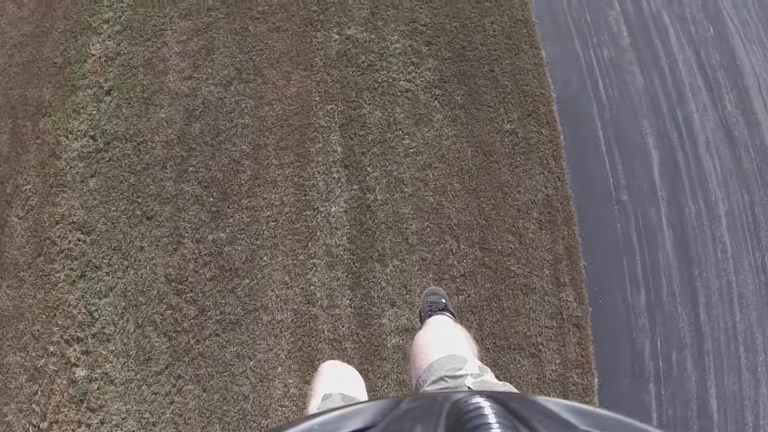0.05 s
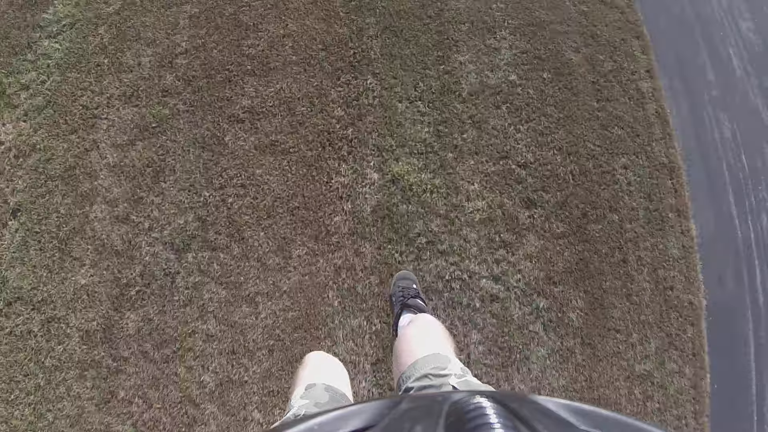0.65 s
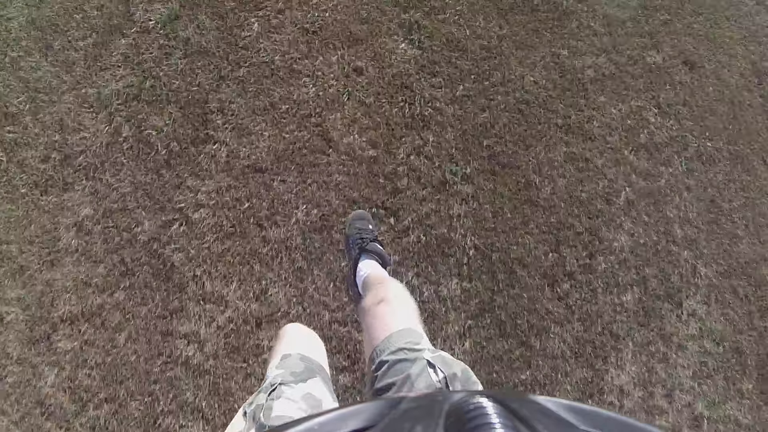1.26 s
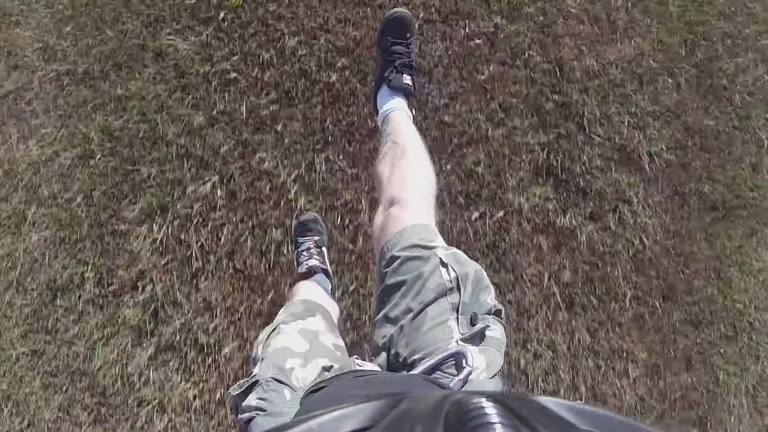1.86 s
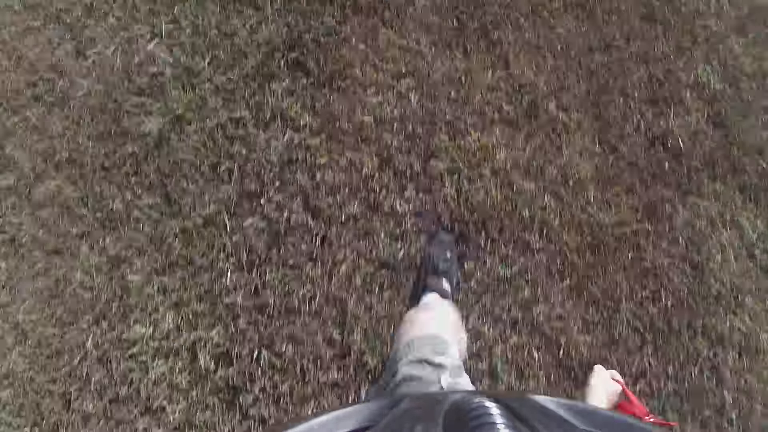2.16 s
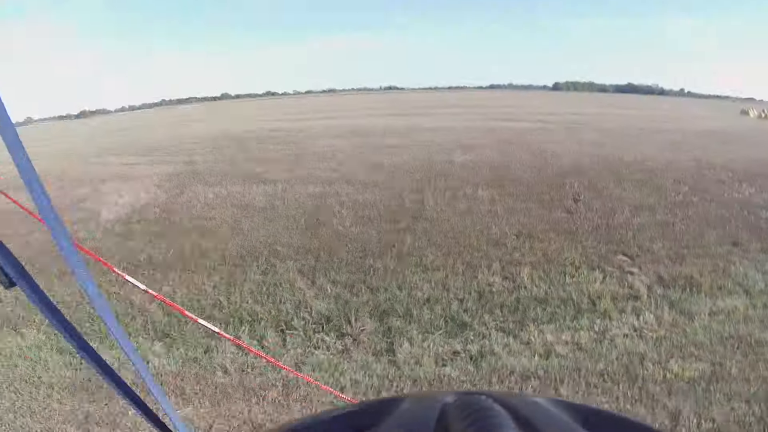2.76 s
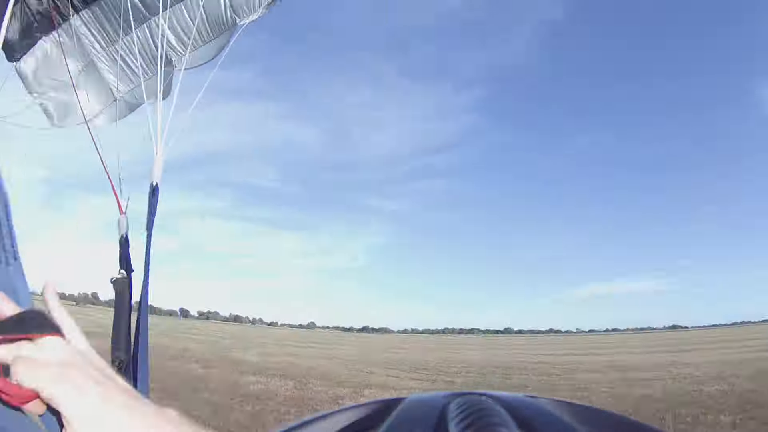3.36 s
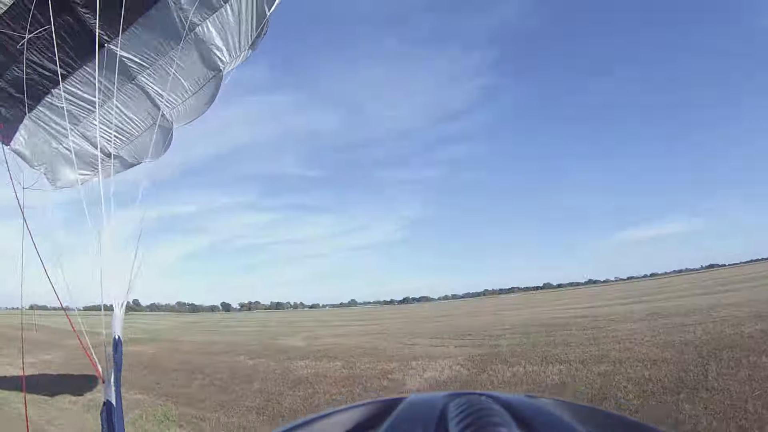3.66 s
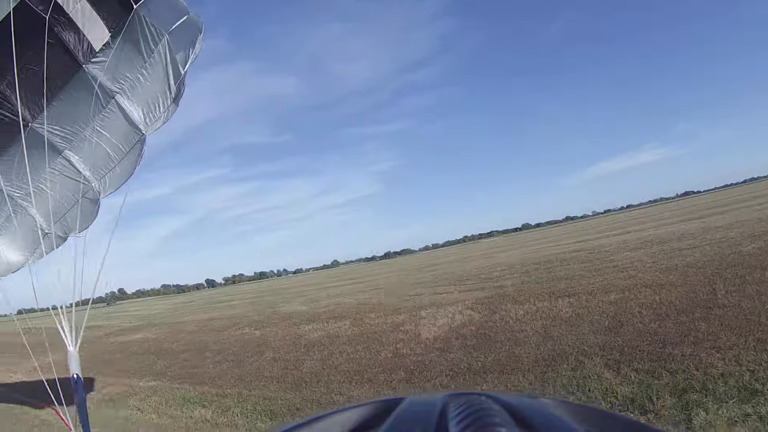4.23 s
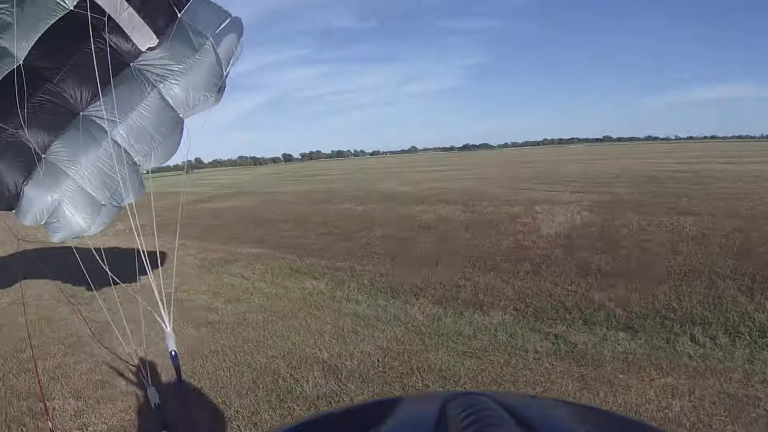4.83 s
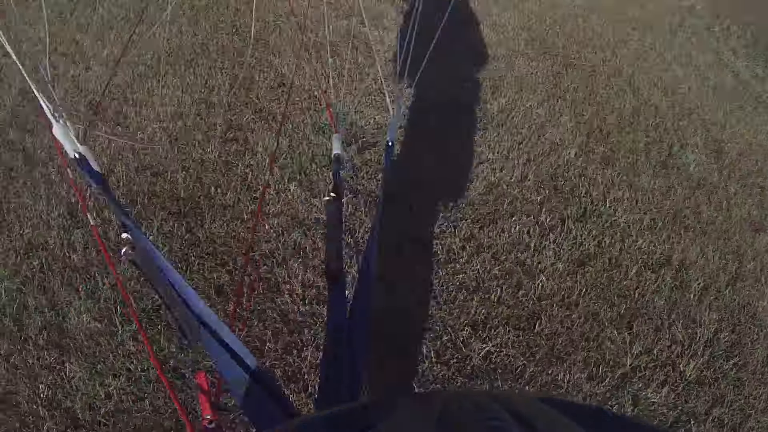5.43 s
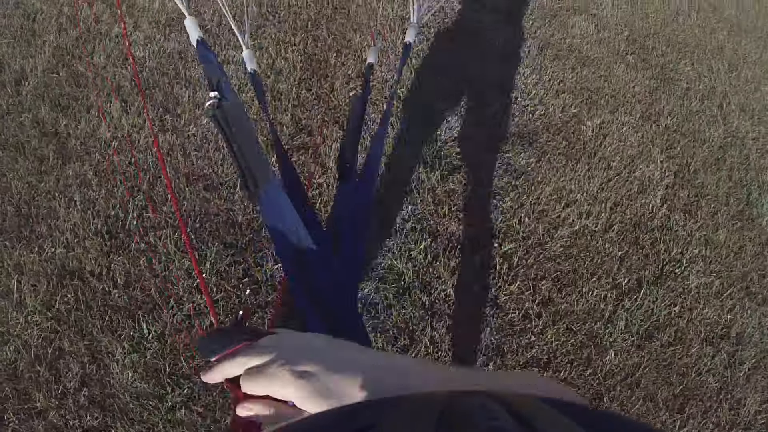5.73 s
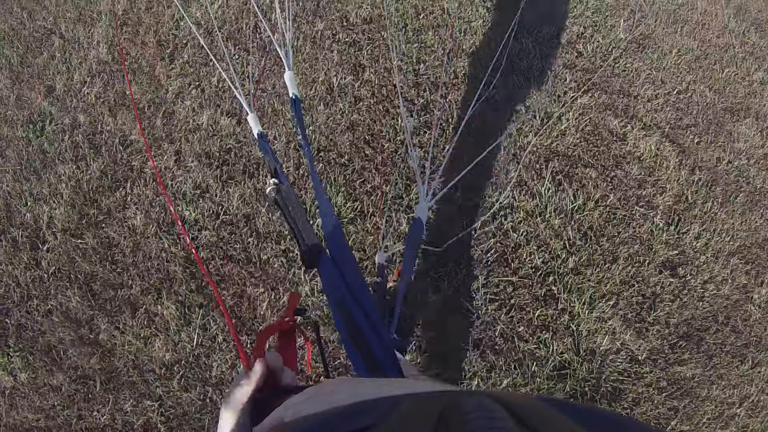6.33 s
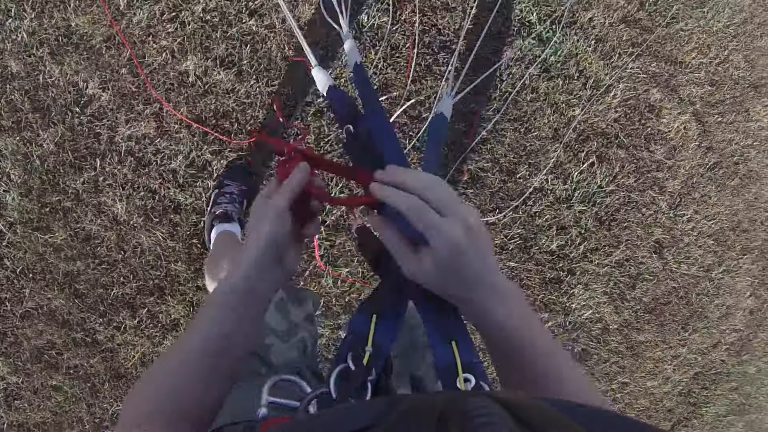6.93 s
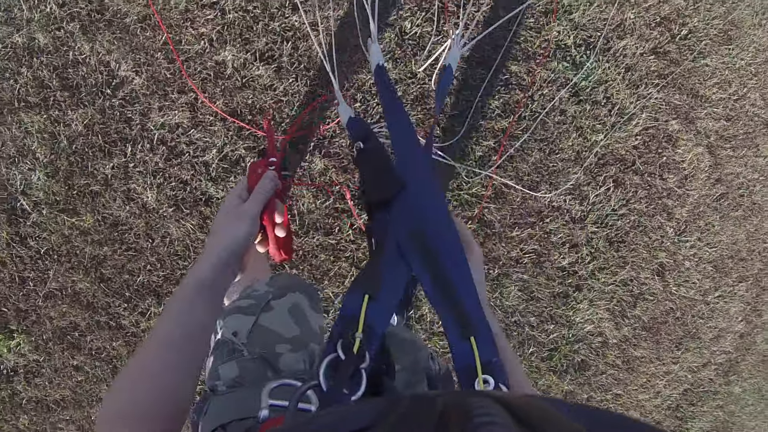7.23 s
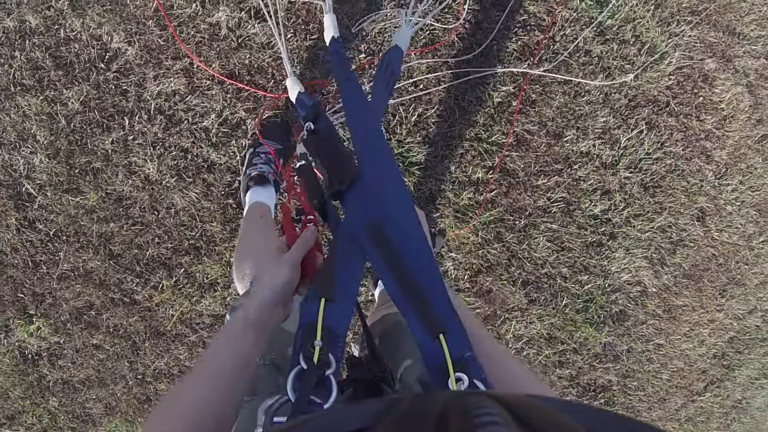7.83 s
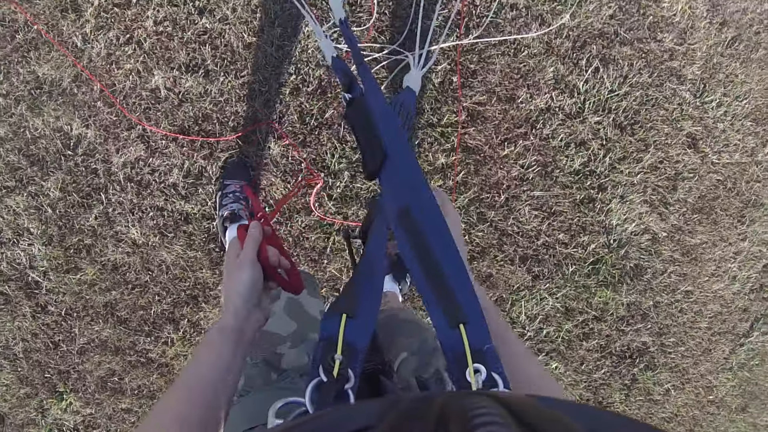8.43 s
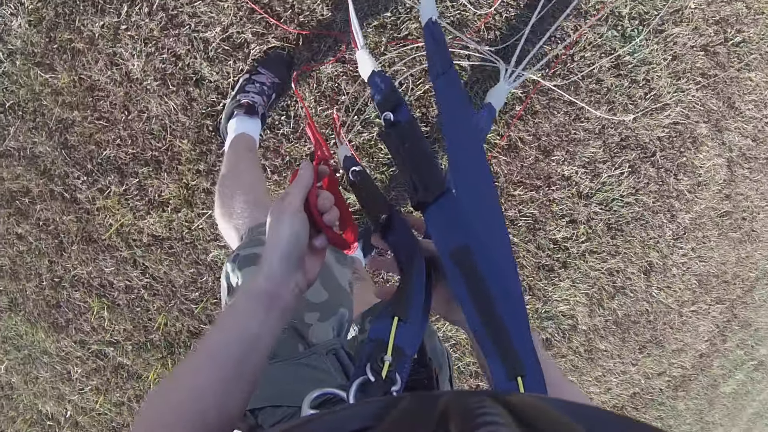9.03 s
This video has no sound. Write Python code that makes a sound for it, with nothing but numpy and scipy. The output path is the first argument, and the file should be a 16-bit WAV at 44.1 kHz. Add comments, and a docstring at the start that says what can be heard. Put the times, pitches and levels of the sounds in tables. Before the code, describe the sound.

A strong, hissing rush of air with a low buffeting rumble blows over a cased helmet microphone, dulling and fading from about 1.4 seconds. At 2.1 seconds the parachutist touches down with a deep thump and a sharp plastic double clack, followed by low footfall jolts, cloth rustle and faint grass swishes. Around 2.9 seconds comes a quick cluster of hard knocks and thuds, with a strap rasping jerkily across the helmet. From 3.5 to 5.5 seconds there are softer, scattered bumps and clicks while sleeves and harness rub close by. The nylon canopy crumples very faintly a few metres off from about 5.3 seconds. Another loud clack and thump hits at 6 seconds, with smaller knocks near 6.5 and 7. The rustling then dies down to the faint hiss of an open field and a tiny tick or two. Thin, very high insect sounds are barely audible underneath.

```python
"""Air rushes over a cased camera on a parachutist's helmet, swooping low over a grass field.
The rush dies as the canopy flares; the touchdown and the steps after it jolt the mount and make
the case knock, right at the microphone. A strap scrapes across the helmet, harness and sleeves
rustle close by, and the canopy crumples onto the grass a few metres off.
Behind it all lie the faint hiss of the open field and two thin insect calls."""
import sys
import numpy as np
from scipy import signal
from scipy.fft import rfft, irfft, next_fast_len
from scipy.io import wavfile
from scipy.ndimage import uniform_filter1d, minimum_filter1d

SR = 44100
rng = np.random.default_rng(int(sys.argv[2]) if len(sys.argv) > 2 else 0)


def int16_out(signal):
    """Quantize to a 16-bit WAV file."""
    q = np.round(np.clip(np.atleast_2d(signal).T, -1, 1) * 32767)
    wavfile.write(sys.argv[1], SR, q.astype(np.int16))


N = 404838
TIME = np.arange(N) / SR
TOUCHDOWN_S, UPRIGHT_S, HANDS_REST_S = 2.05, 3.52, 7.17   # feet touch; run-out ends; hands stop working
MOUNT_HZ, MOUNT_WIDTH_HZ = 105.6, 14.8   # resonance of the springy camera mount

# Air over the case, following the airspeed. Each row: time in seconds, level in dB.
AIRFLOW = [(0.0, -38), (0.35, -39.5), (0.75, -38), (1.2, -39.5), (1.48, -42.5), (1.7, -46), (1.8, -51.5),
           (2.0, -56.5)]
# The rush at the microphone. Each row: frequency in Hz, relative density in dB.
RUSH_SPECTRUM = [(200, 4.5), (400, -1.5), (600, -5.5), (1150, -7), (1500, -3), (2700, -5.5), (3500, -2.5),
                 (4100, -13.5), (5200, -19.5), (6300, -23.5), (8700, -27.5), (10000, -33), (15000, -45)]
# The buffeting that shakes the case. Each row: frequency in Hz, relative density in dB.
BUFFET_SPECTRUM = [(20, -4.5), (40, 0.5), (70, 0.5), (105, 6.5), (150, -2), (200, -10), (300, -16.5),
                   (500, -25), (1000, -44)]
# Cavities that the air blows across. Each row: frequency in Hz, width in Hz, gain in dB.
CAVITIES = [(893, 70, -2.5), (1740, 260, -9.5), (2254, 310, -3.5), (3080, 330, -1), (4660, 170, -1),
            (5550, 170, 6.5)]

def wind(buffet_db=-39.5, flutter_db=0.47, lumps_db=2.1, dull_hz=3700):
    """Turbulence hisses through the case's cavities and shakes it, dying away after touchdown."""
    airflow = from_db(np.interp(TIME, *np.transpose(AIRFLOW)))
    flying = held(-1.2, TOUCHDOWN_S, 1, .15)
    rush = airflow * flying
    buffet = from_db(buffet_db) * np.sqrt(airflow / airflow.max()) * flying
    eddies = np.array([coloured(rng.standard_normal(N), RUSH_SPECTRUM) for _ in range(2)])
    whistles = sum(from_db(db) * resonance(eddies, hz, width) for hz, width, db in CAVITIES)
    fast, slow = rms_one(eddies + whistles)
    slow = signal.sosfilt(signal.butter(4, dull_hz, fs=SR, output="sos"), slow)
    # as the air slows, the small eddies that make the treble are the first to go
    slowness = np.clip(1.14 * (1 - rush / rush.max()) ** 1.6, 0, 1)
    air = np.sqrt(1 - slowness) * fast + np.sqrt(slowness) * slow
    shake = rms_one(on_mount(coloured(rng.standard_normal(N), BUFFET_SPECTRUM), ring_db=-13))
    return rush * air * from_db(flutter_db * drift(35)) + buffet * shake * from_db(lumps_db * drift(20))


# Footfalls and tugs, reaching the microphone through the helmet.
# Each row: centre in seconds, strength in dB, swing frequency in Hz.
JOLTS = [(2.066, -7.5, 28), (2.07, -4, 69), (2.144, -18, 14), (2.248, -17.5, 31.5), (2.306, -21, 30),
         (2.76, -29, 25), (2.822, -26.5, 27), (2.896, -15.5, 92), (2.915, -23, 67), (2.951, -19, 67),
         (2.977, -16, 91), (3.069, -22, 100), (3.52, -33.5, 23), (3.906, -30.5, 30), (4.010, -37, 7.4),
         (4.412, -28, 19.5), (4.55, -41, 95), (4.564, -34.5, 12.6), (4.63, -43, 14), (4.945, -26, 34),
         (5.1, -41.5, 71), (5.466, -20, 32.4), (5.520, -24, 17), (5.966, -5, 41.4), (6.444, -17.5, 45),
         (6.481, -25, 37), (6.929, -32, 30), (8.885, -54, 100), (9.12, -61, 110)]

def jolts(push_db=0.5, shortness=3.37, heel_db=-29):
    """Each jolt is one push and rebound of the helmet, which leaves the mount ringing."""
    pushes, heels = np.zeros(N), np.zeros(N)
    for centre, db, hz in JOLTS:
        near = abs(TIME - centre) < 2 / hz
        turns = (TIME[near] - centre) * hz
        pushes[near] -= from_db(db + push_db) * np.sin(2 * np.pi * turns) * np.exp(-shortness * turns ** 2)
        heels[round(centre * SR)] = from_db(heel_db + db / 2)
    return on_mount(pushes, ring_db=1.5) - signal.fftconvolve(heels, bob(rise_s=0.0037))[:N]


# The rumble of the body under the helmet. Each row: frequency in Hz, relative density in dB.
SWAY_SPECTRUM = [(12, 2.5), (22, 2.5), (40, -8.5), (70, -14), (110, -16.5), (160, -29.5), (300, -43.5),
                 (600, -43.5)]

def sway(sway_db=-30, standing_db=-56, lean_db_per_s=114.5, settle_db_per_s=42.5):
    """The body leans into each jolt and settles after it, rumbling through the helmet."""
    t = np.arange(0, N / SR, .005)
    swings_db = [sway_db + 0.37 * db - np.maximum(lean_db_per_s * (s - t), settle_db_per_s * (t - s))
                 for s, db, _ in JOLTS]
    level = np.hypot(from_db(np.max(swings_db, axis=0)), from_db(standing_db))
    rumble = rms_one(on_mount(coloured(rng.standard_normal(N), SWAY_SPECTRUM), ring_db=1.5))
    return np.interp(TIME, t, level) * rumble


# Modes of the case around the microphone. Each row: frequency in Hz, width in Hz, gain in dB.
CASE_MODES = [(480, 350, -28.5), (970, 270, -7), (1290, 197, 1), (1430, 102, 1.5), (1618, 112, 4),
              (2126, 130, 5.5), (2456, 234, 2.5), (2920, 220, -2.5), (3394, 180, -6.5), (4300, 180, -14.5),
              (4500, 180, -15.5), (5410, 410, -11.5), (5730, 260, -13), (8350, 1200, -41.5)]
# The case knocks in its mount. Each row: start in seconds, ring level in dB, tilt in dB per octave.
KNOCKS = [(2.048, -27, -6), (2.0697, -15, -1.5), (2.0793, -8, 0), (2.154, -35, -3), (2.3455, -31.5, -3),
          (2.6728, -36.5, -8), (2.7626, -37, 2), (2.8482, -39.5, -12), (2.8897, -10, 1.5), (2.923, -30, -6),
          (2.9542, -15, 0), (3.0408, -26, 2), (3.056, -21.5, 4), (3.0934, -33.5, 0), (3.8924, -29.5, -3.5),
          (4.0454, -35.5, -2.5), (4.31, -34, -2.5), (5.061, -33, -1.5), (5.1788, -40.5, -6),
          (5.4546, -41, -4), (5.505, -30, -2), (5.6204, -32.5, -2.5), (5.7079, -43, -7), (5.9398, -38, -2),
          (5.9707, -13, 0.5), (5.9793, -6.5, -1), (6.444, -28, 2), (6.5309, -33, 1.5), (6.6347, -38.5, -3),
          (7.013, -31, -4), (8.084, -44, -3), (8.8782, -50, -14)]

def knocks(chatter_s=.003, shell_s=0.014, soft_hz=4200, hard_hz=7000, vary_db=1.87, thud_hz=340):
    """Plastic chatters on plastic and rings the case; harder blows are brighter and rock the mount."""
    out, t = np.zeros(N + SR), np.arange(SR // 5) / SR
    hardest_db = max(db for _, db, _ in KNOCKS)
    # the padding gives first, so soft knocks are duller
    thud = from_db(-44) * np.sin(2 * np.pi * thud_hz * t) * np.exp(-t / 0.0048)
    # the chatter stops at once, the helmet shell hums on faintly
    dying = np.exp(-t / chatter_s) + from_db(-23) * np.exp(-t / shell_s)
    for s, db, tilt in KNOCKS:
        hardness = from_db(db - hardest_db)
        contact = (t == 0) + 0.075 * rng.standard_normal(len(t)) * dying
        edge_hz = soft_hz + hardness * (hard_hz - soft_hz)
        contact = signal.sosfilt(signal.butter(2, [450, edge_hz], "band", fs=SR, output="sos"), contact)
        ring = from_db(-29) * contact   # the bare crack
        for k, (hz, width, mode_db) in enumerate(CASE_MODES):
            strength = from_db(mode_db + tilt * np.log2(hz / 2000) + vary_db * rng.normal())
            ring += (-1) ** k * strength * resonance(contact, hz, width)
        ring /= abs(ring).max()
        kick = hardness * from_db(-11) * bob(rise_s=0.0067)
        start = round(s * SR)
        out[start:start + len(t)] += from_db(db) * (ring - kick) + hardness ** 0.236 * thud
    return out[:N]


# A strap jerks over the helmet, beside the microphone.
# Each row: start in seconds, length in seconds, opening level in dB.
STRAP_JERKS = [(2.8905, 0.039, -28), (2.935, 0.039, -35), (2.978, 0.074, -40.5), (3.051, 0.012, -39.5)]
# The rasp of its webbing. Each row: frequency in Hz, relative density in dB.
WEBBING_SPECTRUM = [(200, 0.5), (350, 1), (500, -18), (750, -21), (1100, 0), (1900, -3), (2450, 2.5),
                    (3400, 3), (3900, -7), (5600, -7.5), (7000, -18.5), (11500, -23.5), (15000, -30)]

def strap(catch_db=-23, catch_hz=1200, catch_t60_s=0.034, sag_db_per_s=58):
    """The strap catches with a twang of the shell, then rasps on in fading jerks that ring the case."""
    since = np.maximum(TIME - STRAP_JERKS[0][0], 0)
    twang_db = catch_db - np.minimum(60 * since / catch_t60_s, 200)
    twang = from_db(twang_db) * np.sin(2 * np.pi * catch_hz * since)
    drag = np.zeros(N)
    for start, length, db in STRAP_JERKS:
        sag_db = sag_db_per_s * np.clip(TIME - start, 0, length)
        drag += from_db(db - sag_db) * held(start, start + length, 0.0018, 0.0042)
    rasp = coloured(slips(per_s=3500, spread_db=1.5) * from_db(drift(92)), WEBBING_SPECTRUM)
    ring = sum((-1) ** k * from_db(db) * resonance(rasp, hz, width)
               for k, (hz, width, db) in enumerate(CASE_MODES))
    return twang + drag * rms_one(rasp + ring)


# Sleeve and risers brush the helmet. Each row: centre in seconds, level in dB, half-width in seconds.
RUBS = [(2.1, -50.5, 0.17), (2.38, -47, 0.062), (2.67, -53, .025), (2.733, -54, 0.018),
        (3.192, -54.5, 0.048), (3.25, -54, 0.22), (3.455, -59, 0.014), (4.455, -60, 0.032),
        (4.52, -57.5, 0.027), (5.0, -61.5, 0.21), (5.48, -55.5, .048), (5.64, -54.5, .03),
        (5.958, -46, 0.015), (6.03, -64.5, .2), (6.435, -60, 0.049), (6.625, -54, .06), (7.06, -62, 0.11),
        (7.75, -72, .06), (8.2, -69.5, .1)]
# Rubbed cloth, close up. Each row: frequency in Hz, relative density in dB.
CLOTH_SPECTRUM = [(200, -3.5), (600, -14.5), (950, -10.5), (1250, -3), (1700, -0.5), (1950, -3),
                  (2400, 1.5), (2900, -9), (3400, -9.5), (4000, -18), (5600, -23), (7000, -30),
                  (14000, -41)]

def rustle(running_db=-58.5, handling_db=-68, patchy_db=1.5):
    """Cloth slides on harness and helmet, briskly in the run-out, then softly, with firmer strokes."""
    running = from_db(running_db) * held(TOUCHDOWN_S, UPRIGHT_S, .03, 0.17)
    handling = from_db(handling_db) * held(UPRIGHT_S, HANDS_REST_S, .03, 0.17)
    fibres = slips(per_s=7000, spread_db=2.5) * from_db(patchy_db * drift(34))
    return np.hypot(np.hypot(running, handling), strokes(RUBS)) * coloured(fibres, CLOTH_SPECTRUM)


# Dry grass and settling nylon, down at ground level.
# Each row: centre in seconds, level in dB, half-width in seconds.
SWISHES = [(2.053, -56, 0.015), (2.25, -64.5, 0.04), (2.74, -71, 0.079), (3.4, -75, .14), (5.48, -72, 0.12),
           (6.45, -74, 0.07), (6.75, -76.5, 0.94), (7.17, -72, .06)]
# Their hiss. Each row: frequency in Hz, relative density in dB.
SWISH_SPECTRUM = [(3000, -4.5), (6000, -5.5), (8300, -5), (10000, -12.5), (14000, -10.5)]

def swishes():
    """Stalks and thin nylon brush with a fine, high crackle."""
    return strokes(SWISHES) * coloured(slips(per_s=4000, spread_db=5.5), SWISH_SPECTRUM)


# The canopy, a few metres from the microphone. Each row: frequency in Hz, relative density in dB.
NYLON_SPECTRUM = [(1000, -6), (2500, -7.5), (3400, 0), (4000, -9), (4800, -8), (6000, -18), (14000, -31)]

def canopy(start_s=5.32, length_s=0.89, level_db=-67.5):
    """Folds of thin nylon crumple as the canopy sinks onto the grass."""
    sinking = held(start_s, start_s + length_s, 0.4, .55)
    return from_db(level_db) * sinking * coloured(slips(per_s=6000, spread_db=-0.5), NYLON_SPECTRUM)


# The quiet field all around. Each row: frequency in Hz, relative density in dB.
FIELD_SPECTRUM = [(94, -27), (160, 1.5), (262, -2.5), (329, -3), (520, -6), (760, -7.5), (991, -8.5),
                  (1860, -12), (2510, -14.5), (3220, -15.5), (15000, -29.5)]

def field(level_db=-63):
    """Faint, even hiss of the open air."""
    return from_db(level_db) * coloured(rng.standard_normal(N), FIELD_SPECTRUM)


# An insect out in the grass. Each row: centre in seconds, level in dB, half-width in seconds.
CHIRPS = [(1.585, -73.5, .02), (3.795, -77, .02), (5.51, -72, .02), (7.295, -73, .02)]

def insects(chirp_hz=13750, trill_hz=8340, trill_db=-87):
    """One insect chirps and another buzzes thinly, each in a narrow, very high band."""
    chirp, trill = (rms_one(resonance(resonance(rng.standard_normal(N), hz, width), hz, width))
                    for hz, width in ((chirp_hz, 250), (trill_hz, 600)))
    return strokes(CHIRPS) * chirp + from_db(trill_db) * held(4.7, 7.3, .05, .05) * trill


def on_mount(x, ring_db):
    """The camera bobs on its springy mount whenever the helmet is pushed."""
    return x + from_db(ring_db) * resonance(x, MOUNT_HZ, MOUNT_WIDTH_HZ)


def bob(rise_s):
    """The free swing of the mount after one kick, 0.2 s long."""
    t = np.arange(SR // 5) / SR
    swing = np.sin(2 * np.pi * MOUNT_HZ * t) * np.exp(-np.pi * MOUNT_WIDTH_HZ * t)
    return swing * (1 - np.exp(-t / rise_s))


def slips(per_s, spread_db):
    """Fibres catch and let go: random clicks of uneven size."""
    clicks = (rng.random(N) < per_s / SR) * rng.choice([-1, 1], N)
    return clicks * from_db(spread_db * np.minimum(rng.exponential(1, N), 4))


def strokes(rows):
    """A gain that swells and fades in one bell curve per row."""
    gain = np.zeros(N)
    for centre, db, half_width in rows:
        near = slice(*np.searchsorted(TIME, [centre - 2 * half_width, centre + 2 * half_width]))
        gain[near] += from_db(db) * np.exp(-2 * ((TIME[near] - centre) / half_width) ** 2)
    return gain


def held(start, end, attack, release):
    """A gain that rises from `start`, holds until `end` and then dies away; all in seconds."""
    return np.clip((TIME - start) / attack, 0, 1) * np.exp(-np.clip((TIME - end) / release, 0, 20))


def drift(rate_hz):
    """A smooth random wander of spread 1, up to about `rate_hz`."""
    lowpass = signal.butter(2, rate_hz, fs=SR / 40, output="sos")
    slow = signal.sosfilt(lowpass, rng.standard_normal(N // 40 + 2002))[2000:]
    return np.interp(np.arange(N) / 40, np.arange(len(slow)), rms_one(slow))


def resonance(x, hz, width_hz):
    """One resonance with gain 1 at its peak."""
    r = np.exp(-np.pi * width_hz / SR)
    feedback = [1, -2 * r * np.cos(2 * np.pi * hz / SR), r * r]
    return signal.lfilter(np.array([1, 0, -1]) * (1 - r * r) / 2, feedback, x + 1e-18)


def coloured(x, spectrum):
    """Give a steady signal a spectrum that falls away beyond its ends; rms 1."""
    hz, db = np.transpose(spectrum)
    size = next_fast_len(N)
    f = np.arange(size // 2 + 1) * SR / size + 1e-3
    ends = np.minimum(f / hz[0], 1) ** 2 * np.minimum(hz[-1] / f, 1) ** 2
    shape = from_db(np.interp(np.log(f), np.log(hz), db))
    return rms_one(irfft(rfft(x, size) * ends * shape, size)[:N])


def from_db(db):
    """Decibels to gain."""
    return 10 ** (np.asarray(db) / 20)


def rms_one(x):
    """Scale to unit rms."""
    return x / np.sqrt(np.mean(x ** 2) + 1e-20)


def scene():
    """Everything reaches one microphone inside the case on the helmet."""
    close = wind() + jolts() + sway() + knocks() + strap() + rustle()
    return (close + swishes() + canopy() + field() + insects())[None]


def record(dry):
    """The camera's smooth limiter holds the peaks at full scale; the treble is cut above 15.4 kHz."""
    reach = int(0.01 * SR)   # the limiter looks ahead and behind
    gain = uniform_filter1d(minimum_filter1d(1 / np.maximum(abs(dry), 1), 2 * reach), reach)
    return signal.sosfilt(signal.ellip(10, .1, 80, 15400, fs=SR, output="sos"), dry * gain)


dry = scene()
out = record(dry)
int16_out(out)
```